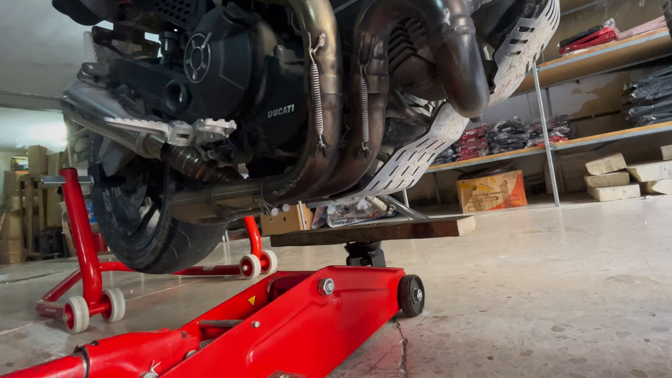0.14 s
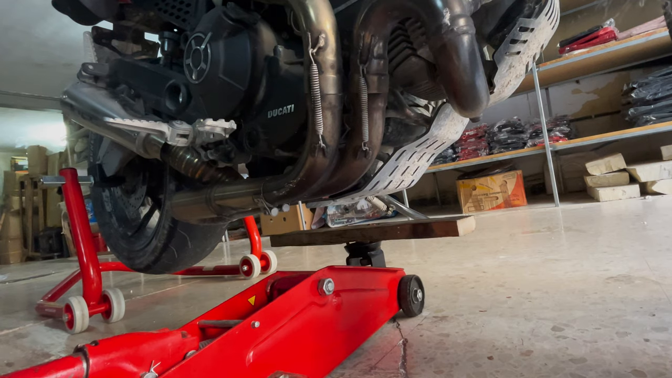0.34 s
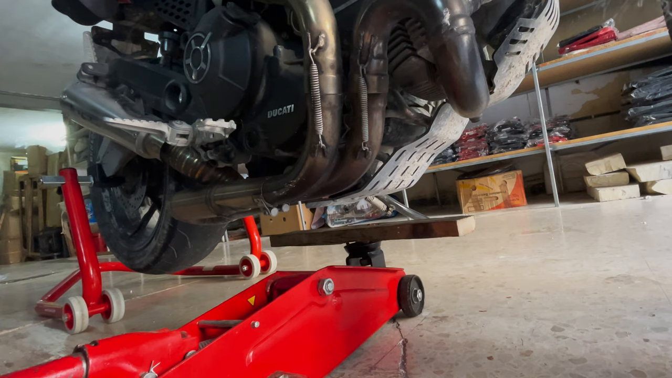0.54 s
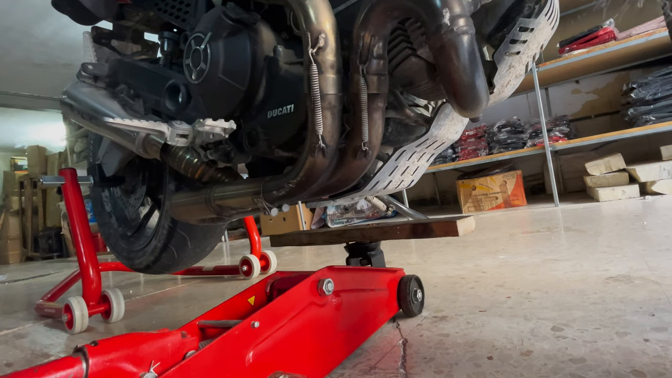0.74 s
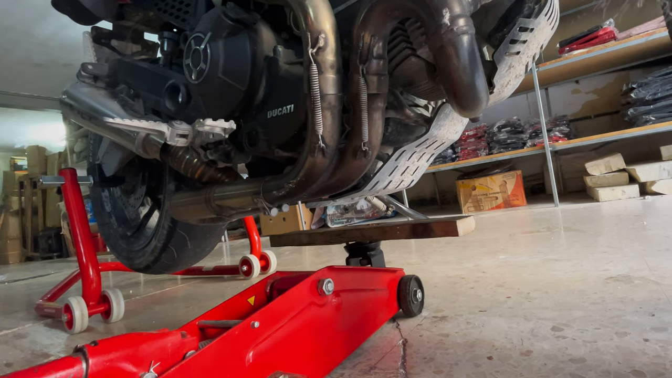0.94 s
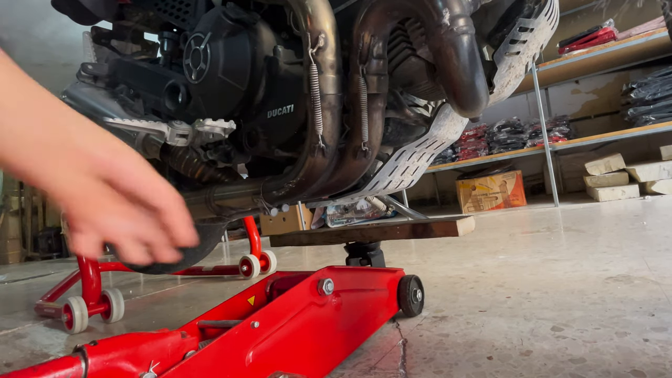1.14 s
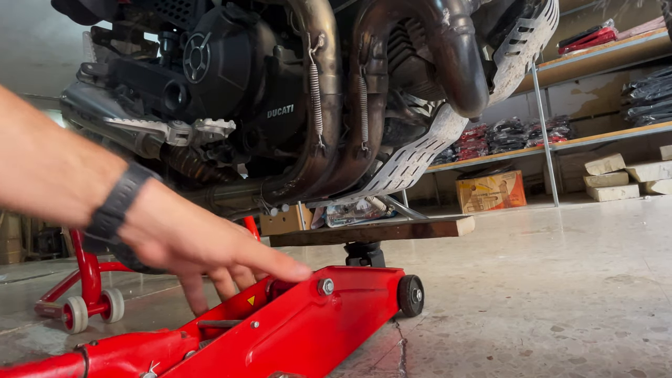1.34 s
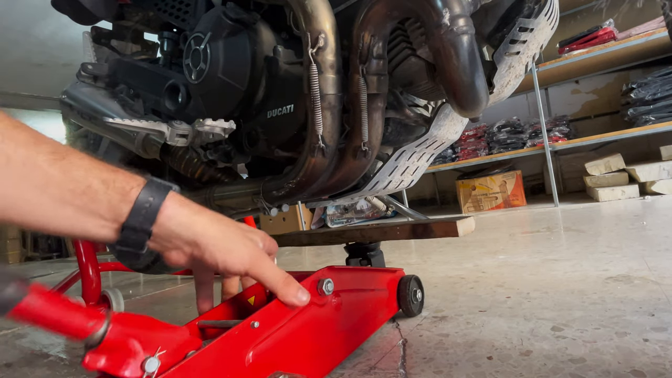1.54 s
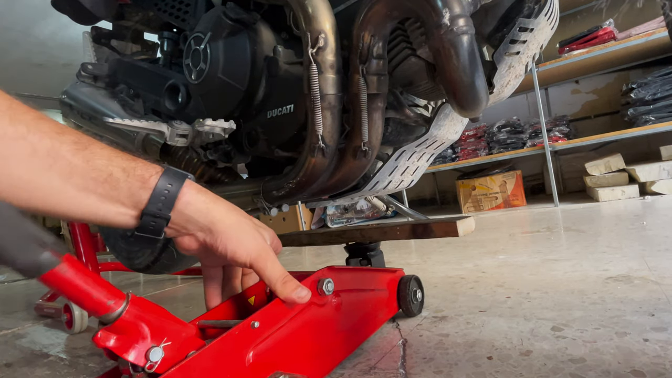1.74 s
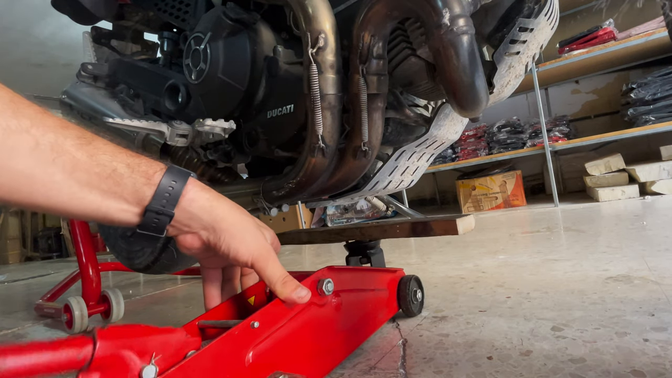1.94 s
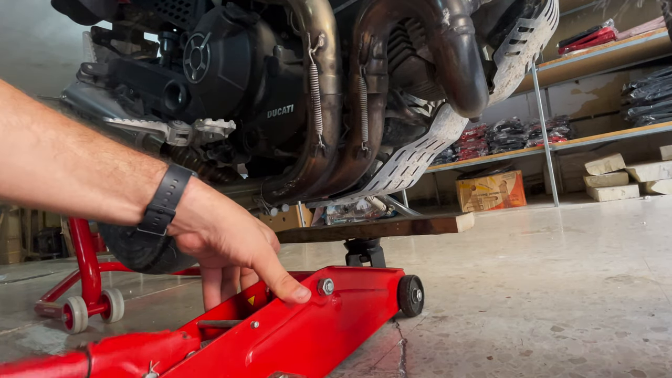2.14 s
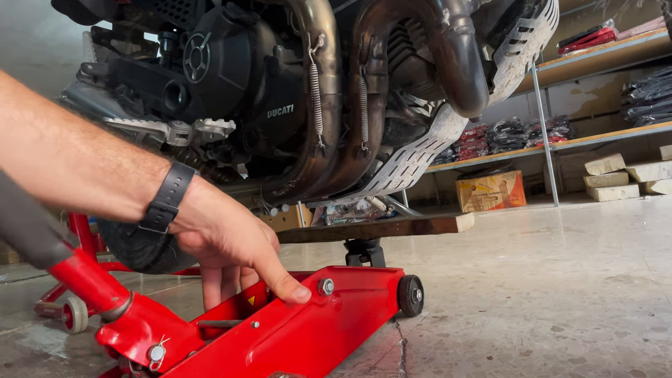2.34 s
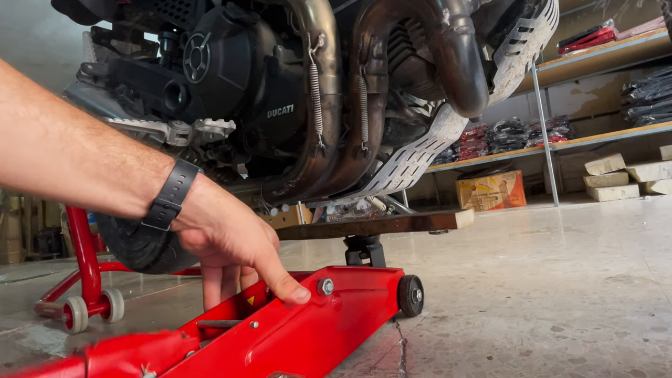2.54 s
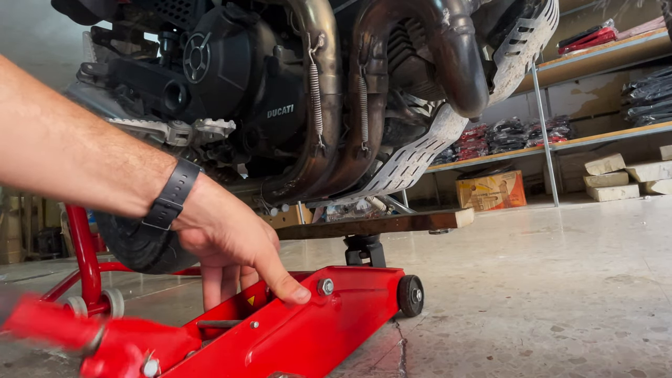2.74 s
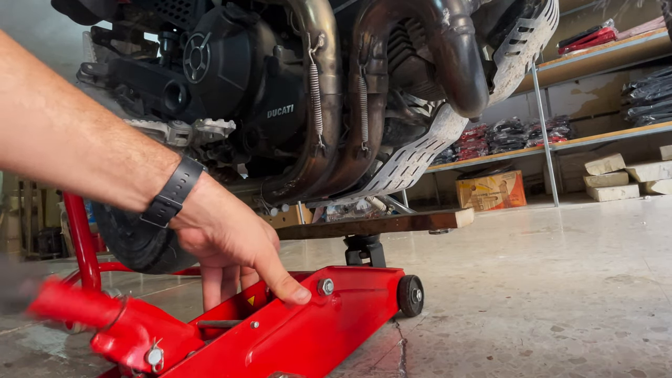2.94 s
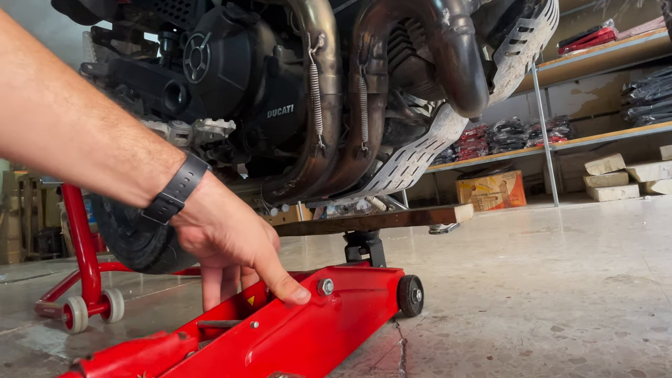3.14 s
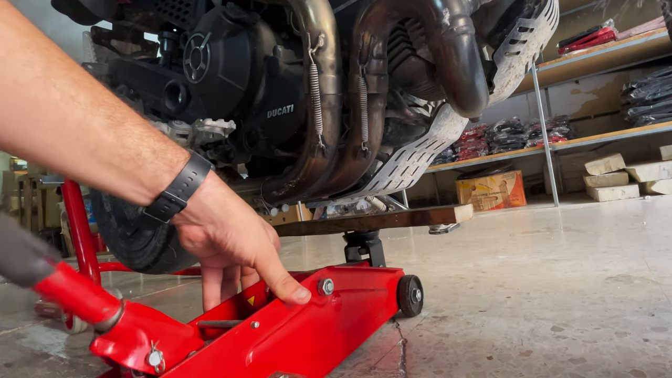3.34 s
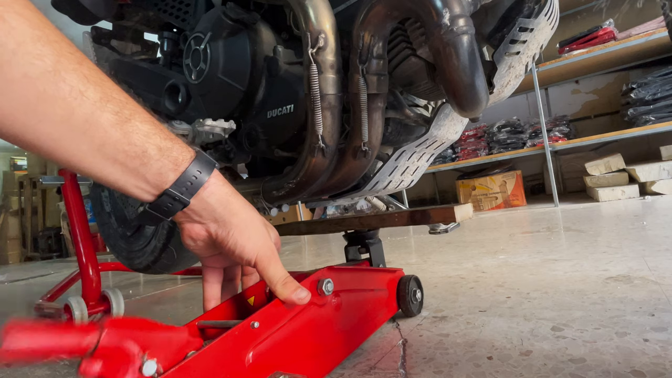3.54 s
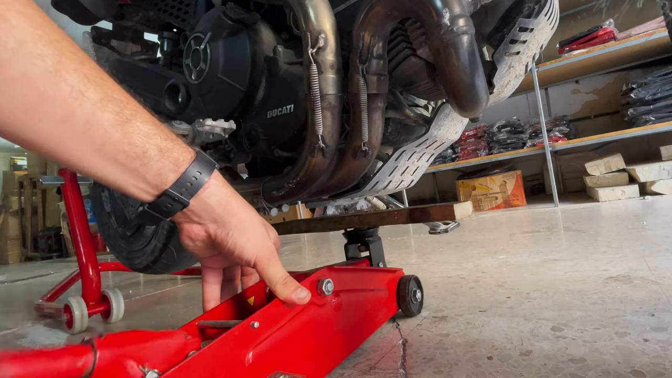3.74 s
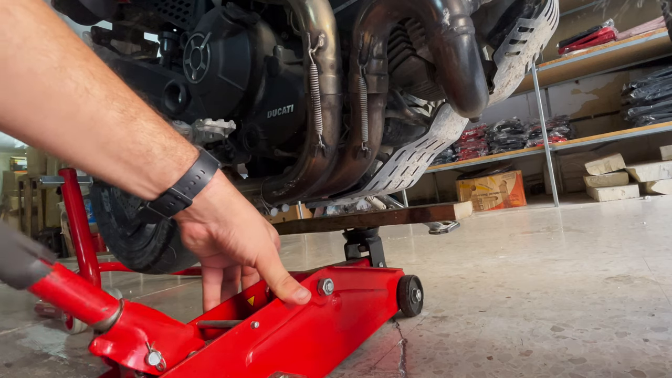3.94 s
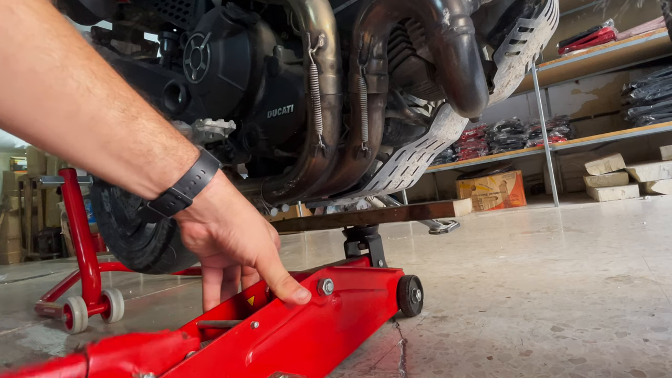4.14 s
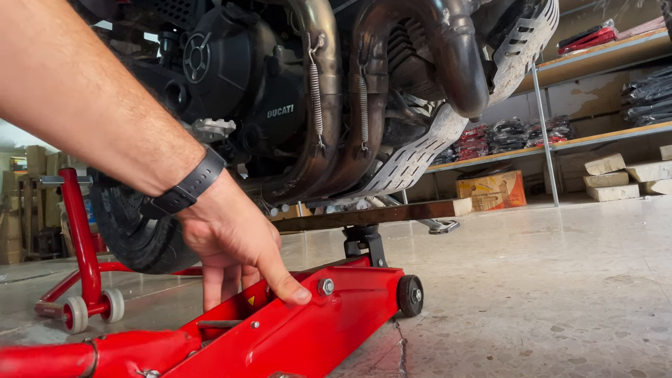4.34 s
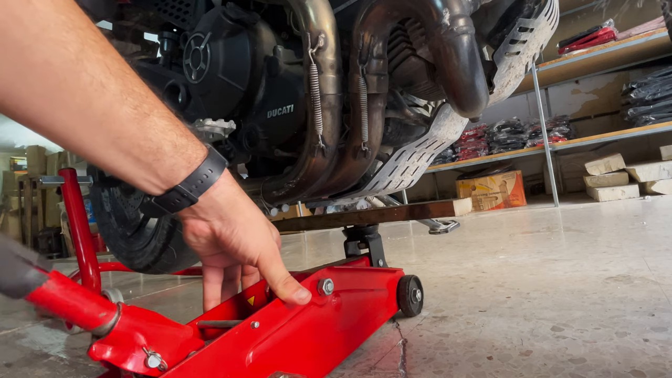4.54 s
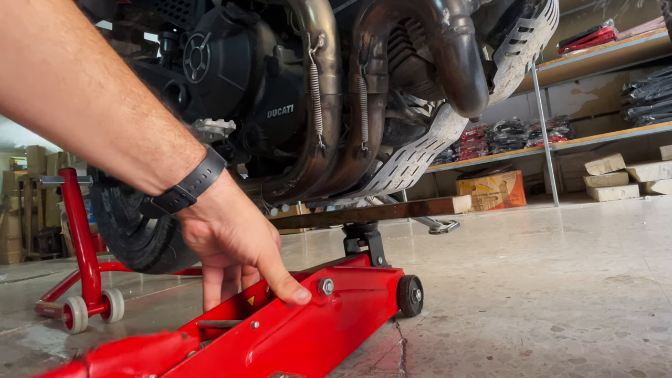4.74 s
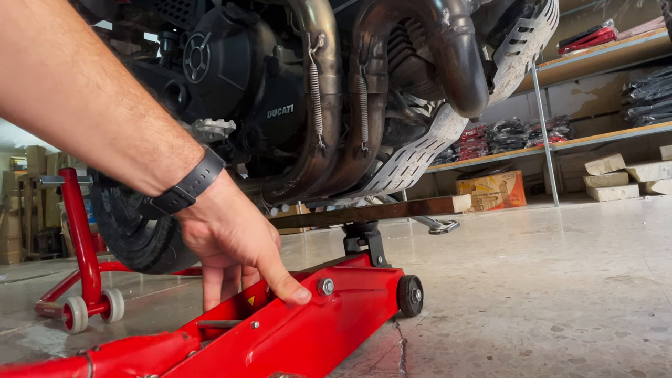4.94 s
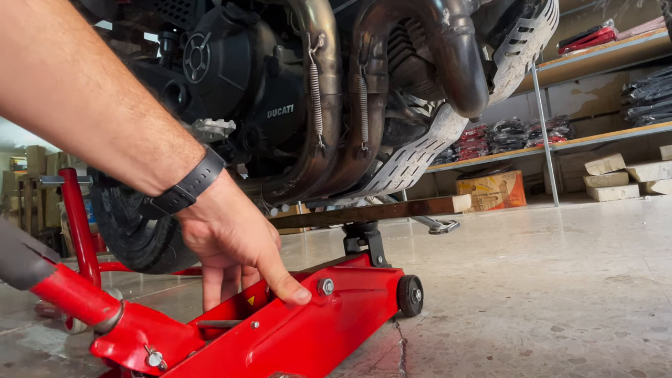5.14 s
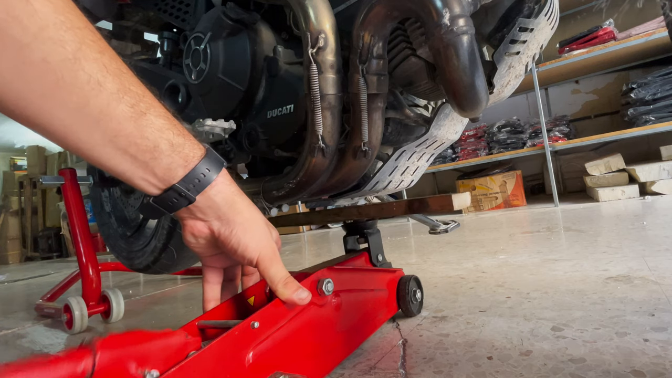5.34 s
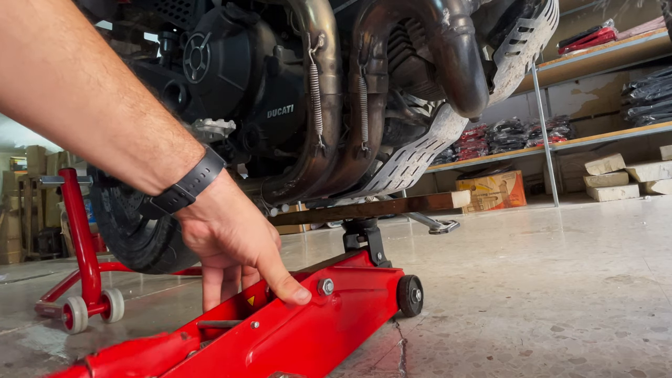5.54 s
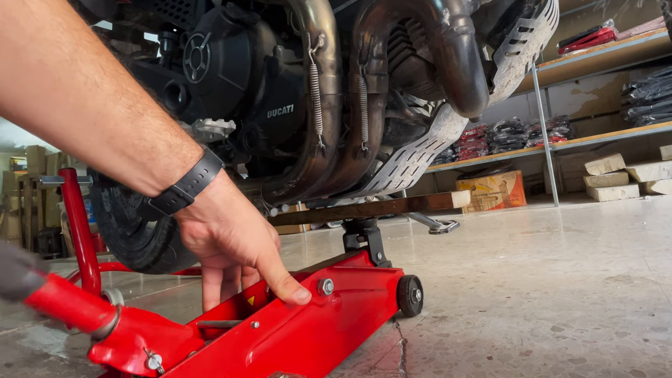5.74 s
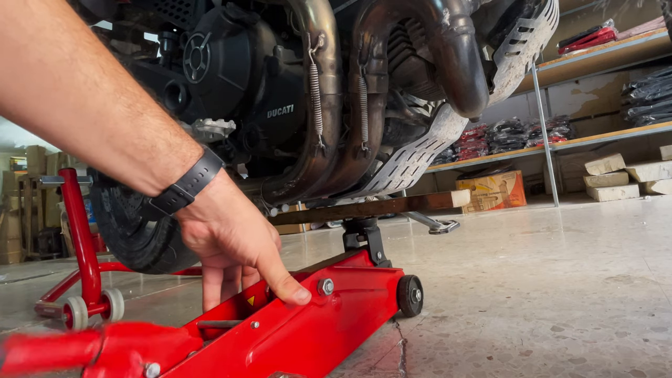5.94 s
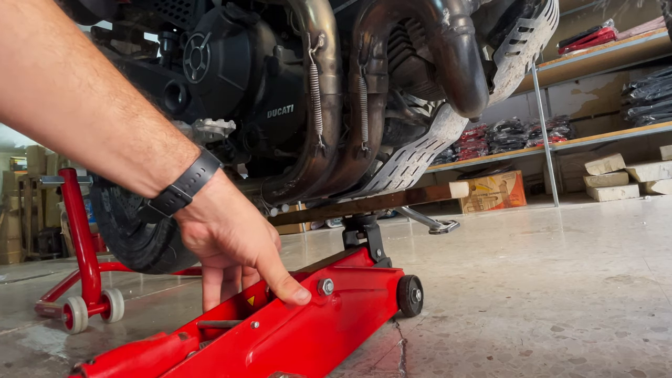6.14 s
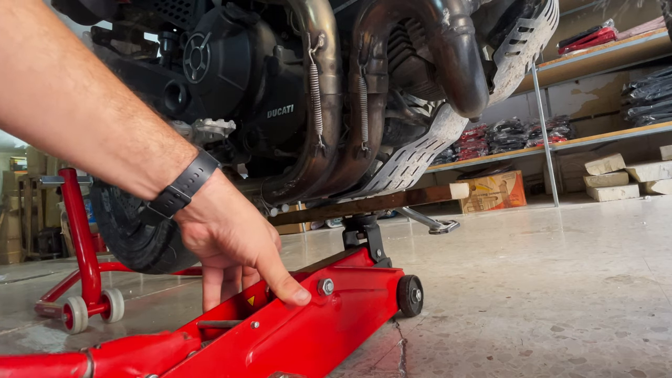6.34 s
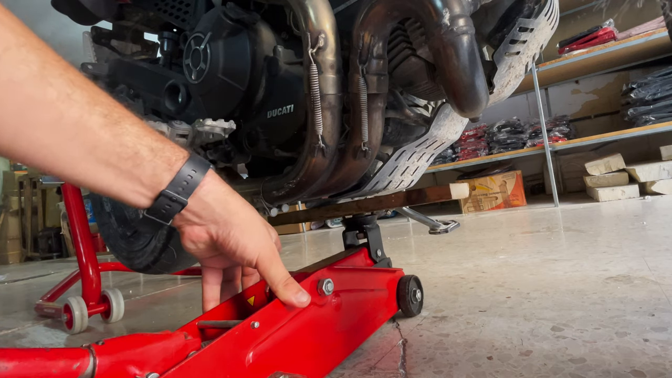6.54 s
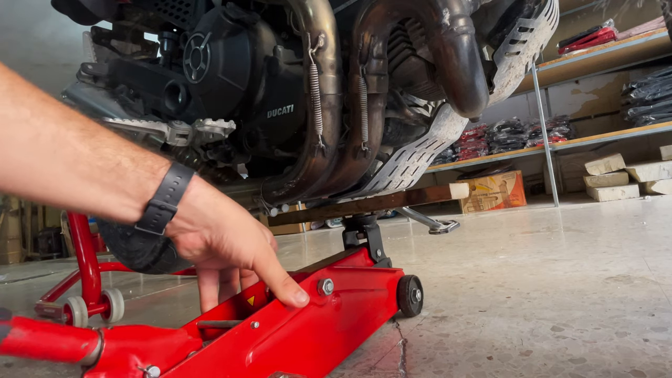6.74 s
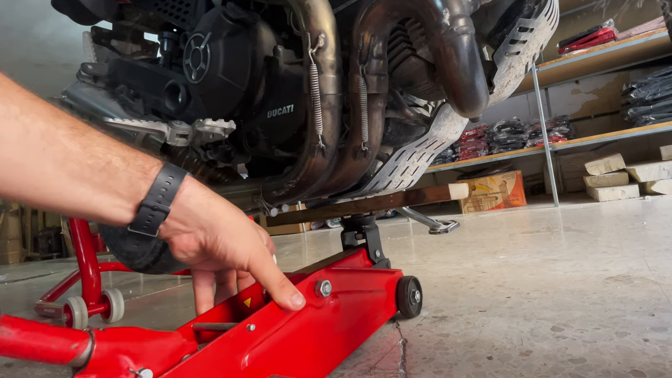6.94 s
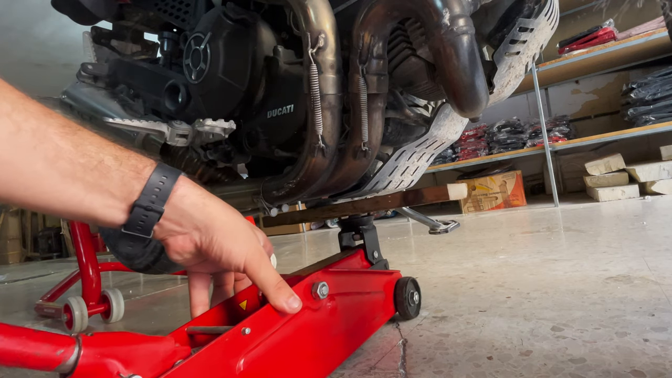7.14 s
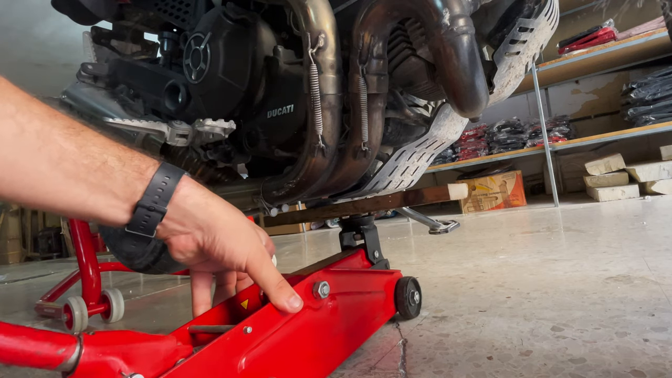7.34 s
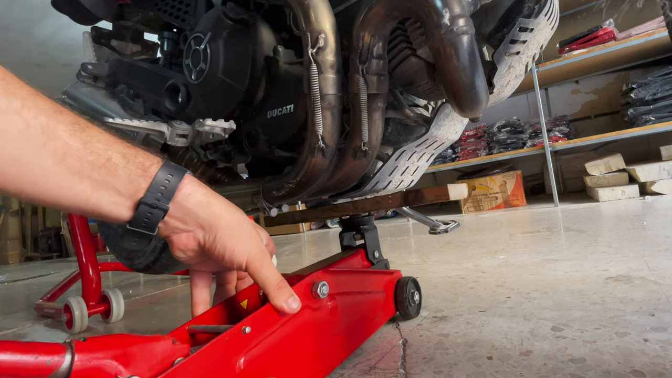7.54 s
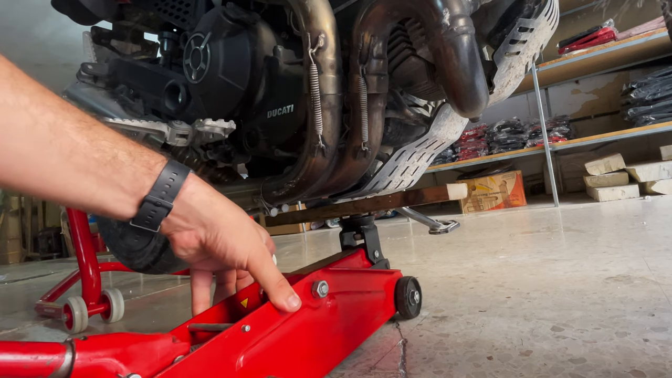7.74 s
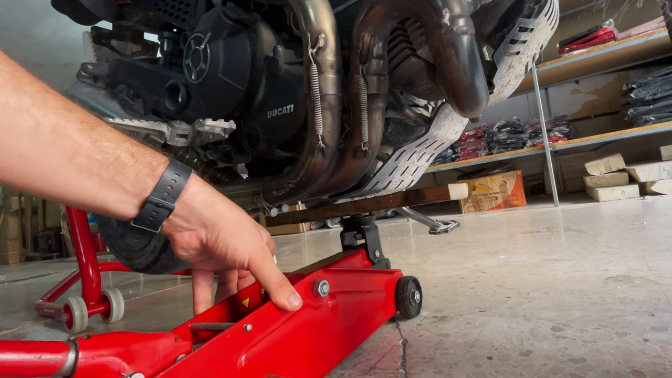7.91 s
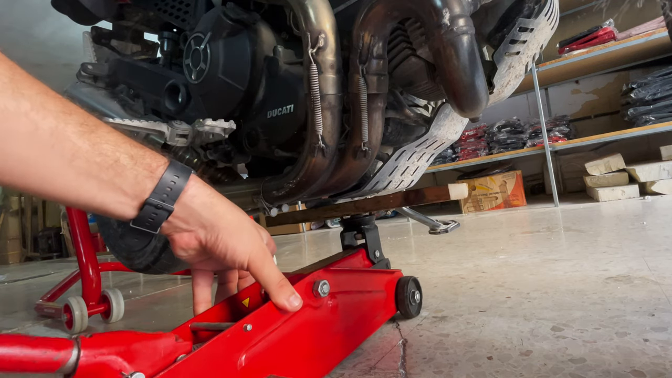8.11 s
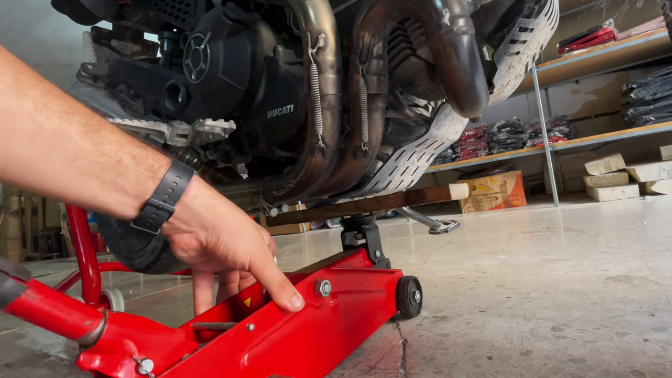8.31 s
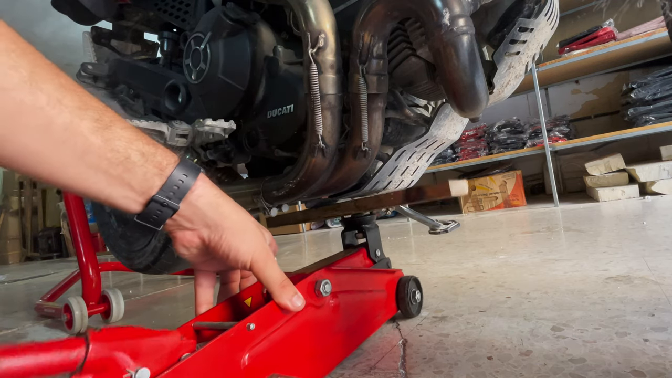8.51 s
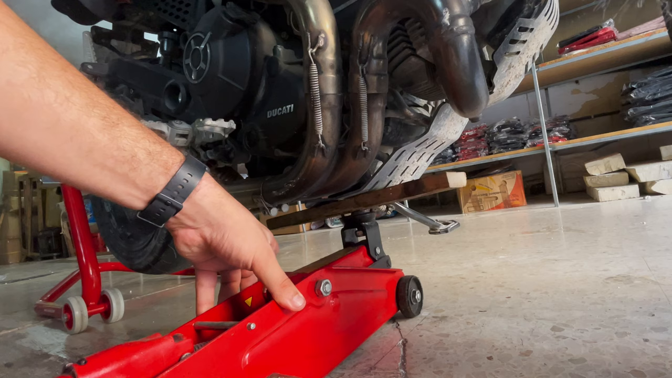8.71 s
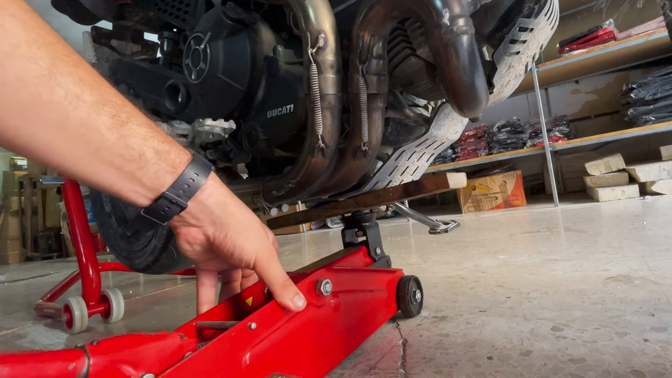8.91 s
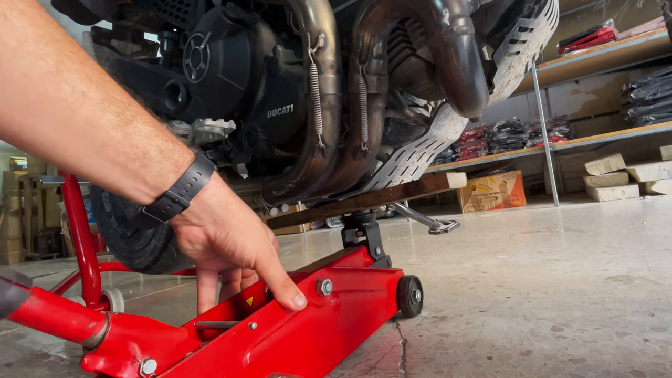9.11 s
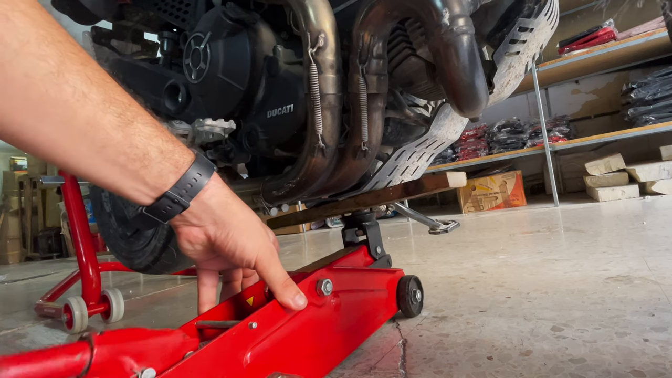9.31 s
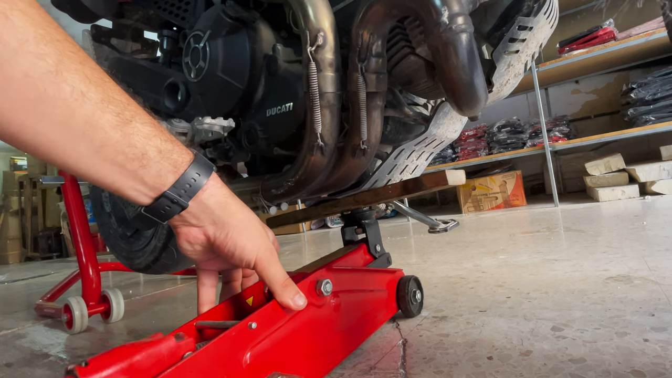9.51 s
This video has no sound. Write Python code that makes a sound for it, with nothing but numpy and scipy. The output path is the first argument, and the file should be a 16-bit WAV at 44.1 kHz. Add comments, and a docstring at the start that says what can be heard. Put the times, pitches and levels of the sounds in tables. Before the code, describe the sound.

A quiet garage with low room hush and a brief low puff of air on the close microphone at the very start. From 0.6 to 1.1 s, sleeve cloth rustles softly, with small dry ticks and light hollow taps. At about 1.4 s slack metal clicks, and fast jack pumping begins: hard, bright double clacks land near 1.9, 2.5, 3.0, 3.5, 4.1, 4.7 and 5.3 s. Between them pins click, loose links rattle, and soft low thuds bump the chassis. Sharp knocks continue at 5.5 to 6.4 s, then stop. Around 7 s a hand rubs faintly on steel with tiny clicks; near silence follows, with a soft bump at 7.5 s. Hollow knocks from 8.2 s lead to a strong clack at 8.5 s, smaller rattles at 8.8 to 8.95 s, and a final clack at 9.3 s. Each impact is dry and close, with a short, faint room tail.

```python
"""In a garage, a steel floor jack is pumped by hand close to a small microphone on the concrete.
After small ticks of hand or watch, slack handle, pins and plunger knock: noise bursts excite
resonances of steel, frame and chassis. Loose links tick during the pumping; a sleeve and a hand rub
as swells of grainy, filtered noise. Faint, thin, flickering tones are unsteady sines; decaying noise
forms the room's tail over a quiet hush."""
import sys
import numpy as np
from scipy import signal
from scipy.fft import rfft, irfft, next_fast_len
from scipy.io import wavfile
from scipy.ndimage import uniform_filter1d, map_coordinates

SR = 44100
rng = np.random.default_rng(int(sys.argv[2]) if len(sys.argv) > 2 else 0)


def store_pcm(level_fs):
    """Save levels as 16-bit WAV."""
    pcm = np.round(np.clip(level_fs, -1, 1) * 32767).astype(np.int16)
    wavfile.write(sys.argv[1], SR, np.atleast_2d(pcm).T)


N = 426447

# room tone, relative spectral density: (frequency [Hz], density [dB per Hz])
HUSH_SPECTRUM = [(20, -24.5), (38, -31.5), (57, -15), (95, -29), (150, -27), (300, -39.5), (1300, -43),
                 (2200, -51.5), (6000, -56.5), (15500, -65)]
# slow air pressure on the microphone: (time [s], level [dB])
AIR_SWAY = [(0, -25.5), (.35, -39), (.7, -47.5), (4, -43.5), (9.67, -49)]
# strokes of the sleeve, then of the hand: (peak time [s], rise [s], fall [s], level [dB])
SLEEVE_STROKES = [(.33, .01, 0.02, -65.5), (.6, 0.048, 0.061, -65.5), (.8, .04, 0.028, -60),
                  (.87, 0.019, 0.029, -55), (.94, 0.031, 0.02, -52), (1.02, 0.015, 0.029, -46),
                  (1.32, 0.063, 0.081, -62.5)]
HAND_STROKES = [(6.92, 0.091, 0.042, -60.5), (7.08, 0.079, 0.047, -57.5), (7.72, 0.025, 0.028, -68)]
# rubbed cloth, relative spectral density: (frequency [Hz], density [dB per Hz])
CLOTH_SPECTRUM = [(300, -26), (700, -3), (2000, 3), (6000, 2), (10000, 1), (15500, -9)]
# resonances of the rubbed steel: (frequency [Hz], width [Hz], relative level [dB])
RUBBED_STEEL = [(1050, 210, -6), (2487, 61, 3), (3175, 153, -7.5), (3960, 62, -27), (5350, 300, -13),
                (6880, 310, -7.5), (9860, 620, -18)]

# small ticks of hand or watch at first, then pins and links knocking as the handle swings:
# (time [s], ring level [dB], thud level [dB], pitch of part struck [Hz], chatter [ms])
KNOCKS = [(0.65, -52.5, -77, 6363.0, 4.9), (0.807, -43, -48.5, 2060, 14), (0.925, -48, -55.5, 3660.0, 3.2),
          (1.14, -47.5, -83, 10100, 3.8), (1.363, -37.5, -39, 2939.0, 7.7), (1.381, -38, -49, 3600, 9),
          (1.407, -36.5, -42.5, 9400, 11.3), (1.4752, -31, -26.5, 4898.0, 2),
          (1.481, -21, -32.5, 5070, 5.1), (1.512, -32.5, -42, 2410, 5.8), (1.775, -42, -43, 3020, 2.4),
          (1.8, -52, -41.5, 4400, 5.7), (2.144, -30.5, -39.5, 3994.0, 3.8), (2.152, -31.0, -46, 9500, 8.5),
          (2.188, -38, -46, 9323.0, 2), (2.206, -25.5, -32, 5200, 6.6), (2.219, -28.5, -26.5, 2637.0, 4.6),
          (2.275, -35, -29, 2030, 11.4), (2.419, -31, -41, 5530, 11), (2.482, -22, -25.5, 2370, 8.1),
          (2.667, -32, -39.5, 4060, 3.4), (2.686, -29, -35, 9400, 10), (2.725, -40, -27, 2770, 4.9),
          (2.733, -22, -29, 2870, 12.5), (2.905, -46, -56, 4250, 4.6), (2.922, -50, -43, 3100, 7.6),
          (2.9642, -27, -39, 5469.0, 5.1), (3.186, -24, -38.5, 4100, 8.9), (3.211, -36, -37, 2320, 6.8),
          (3.252, -40, -32.5, 8397.0, 2.3), (3.2615, -15.5, -26, 5040, 3.3), (3.322, -31.5, -26, 2300, 8),
          (3.432, -39.5, -46.5, 4310, 6.9), (3.52, -16, -39, 5660, 12.3), (3.553, -21, -37, 4270, 6.1),
          (3.737, -26.5, -28.5, 5500, 9.1), (3.755, -29.5, -58, 8387.0, 13), (3.8, -21, -35, 5700, 5.5),
          (3.841, -38.5, -46, 2045.0, 3.3), (4.022, -38, -43, 5500, 5), (4.282, -50.5, -56, 3550, 5.5),
          (4.297, -33, -32.1, 5460, 12), (4.309, -33, -31, 8300, 8.8), (4.34, -28.5, -34, 2885.0, 11.7),
          (4.393, -21.5, -28.5, 2720, 5.2), (4.672, -21, -28.5, 10120.0, 2.7),
          (4.894, -34.0, -46, 4250, 20), (4.904, -32, -34, 5458.0, 4.8), (4.943, -36.5, -35, 5530, 7.2),
          (4.993, -25, -32, 2170, 6.9), (5.035, -40, -36, 2476.0, 5.7), (5.191, -46, -42, 2034.0, 4.1),
          (5.284, -25, -25, 9900, 4.7), (5.293, -34.5, -31, 9797.0, 25), (5.463, -14.5, -22, 3210, 5.2),
          (5.543, -25.5, -32, 6830, 5.5), (5.594, -29.5, -40.1, 3326.0, 8), (5.6246, -22, -35.5, 4730, 4.9),
          (5.885, -47.5, -40, 3280, 5.4), (5.906, -37.5, -32, 5415.0, 6.1), (5.934, -23, -32, 9640, 9.4),
          (6.041, -58, -54, 9500, 5.6), (6.055, -50, -65, 4540, 3.6), (6.197, -36.0, -41.3, 3229.0, 7),
          (6.202, -18, -33, 3540, 6.6), (6.246, -28.5, -69, 9500, 4.4), (6.308, -45, -54.0, 2239.0, 8.7),
          (6.361, -31.5, -36.5, 2260, 7.1), (6.376, -35, -38, 8900.0, 2.1), (7.175, -46, -39.7, 2430, 8.3),
          (7.194, -47.5, -61, 6104.0, 2.5), (8.385, -43.5, -51, 3380, 7), (8.46, -43.5, -44.3, 5544.0, 5.4),
          (8.495, -21.5, -35.5, 8344.0, 11.4), (8.832, -40.5, -43.5, 2940, 10),
          (8.854, -30.4, -51, 9500, 2.3), (8.921, -42.2, -36, 2960, 13.0), (8.934, -43, -35, 2900, 2.8),
          (8.955, -26, -30.5, 3445.0, 2.7), (9.275, -28.5, -43, 6730, 4)]
# contacts with a stronger, hollow mid-range clank: columns as in KNOCKS
HOLLOW_CONTACTS = [(0.784, -41, -52, 2099.0, 4.6), (0.842, -44, -48, 6395.0, 7.6),
                   (0.858, -33, -45, 9937.0, 9.5), (3.335, -30, -32.5, 2280, 5.1),
                   (3.815, -25.5, -30.5, 3348.0, 5.1), (5.63, -27.5, -28, 2470, 4.5),
                   (5.945, -25, -28.2, 2820, 7.7), (8.197, -33, -39.5, 3326.0, 6.7),
                   (8.264, -38.5, -44.5, 3219.0, 3.5), (8.844, -31.5, -39, 6850, 5.6)]
HOLLOW_DB = 7  # added mid-range clank of these contacts
# clank of a knock: this share of ring dB, the rest thud dB, an offset, and a slope with pitch
RING_SHARE, CLANK_DB, CLANK_DB_PER_OCT = 0.39, -4, 0.5

# end of each down-stroke, slack taken up (the lead) and then the handle meets its stop:
# (stop time [s], ring level [dB], thud level [dB], chatter [ms], lead time [ms], lead ring level [dB])
DOWN_STROKES = [(1.8582, -11.5, -26, 2.6, 19.2, -20), (2.47, -14.5, -32, 6.5, 17, -17.5),
                (2.9927, -11.5, -23.5, 3.2, 19.7, -18.5), (3.5444, -12.5, -27, 3.3, 22.2, -18.5),
                (4.078, -15, -26, 6.5, 23, -16), (4.679, -14, -26, 4.14, 27.9, -24.5),
                (5.3063, -12.5, -27.5, 5.4, 28.9, -25), (8.5028, -14.5, -28.5, 3.2, 25, -19.5),
                (9.2876, -13.5, -31, 6.2, 22.4, -21.5)]
STOP_HZ, STOP_CLANK_DB = 9540, -12  # pitch of part struck; clank against ring
LEAD_HZ, LEAD_CHATTER_MS = 5750, 9
LEAD_CLANK_DB, LEAD_THUD_DB = -15.5, -14  # against ring

# soft bumps of the chassis with hardly any ring: (time [s], thud level [dB])
BUMPS = [(1.597, -40), (1.728, -39.5), (2.321, -34.5), (2.397, -43), (2.817, -29.5), (2.88, -36.5),
         (3.807, -25), (3.897, -34.5), (4.989, -29.5), (5.128, -39), (5.452, -27.5), (5.964, -31.5),
         (7.487, -47), (8.184, -37), (8.319, -50), (8.558, -41), (8.667, -47.5)]
BUMP_HZ, BUMP_CHATTER_MS = 1180, 13
BUMP_RING_DB, BUMP_CLANK_DB = -19.5, -6.5  # against thud

# resonances of pins, handle and arms; of the side plates; of the chassis on concrete:
# (frequency [Hz], width [Hz], nominal relative level [dB])
STEEL = [(2565, 53, -14), (3290, 130, -23), (4008, 100, -4), (4713, 50, -20), (5540, 120, -4),
         (6690, 37, -3.5), (8455, 54, -6.5), (9330, 80, -0.5), (10430, 400, -2.5), (10150, 93, -4),
         (11800, 87, -2), (14000, 60, -3.5), (14700, 120, -6)]
FRAME = [(1087, 95, 5), (1375, 71, -9), (1737, 140, 1), (2044, 47, -17), (555.6, 350, -2.5)]
BASE = [(83.3, 18, -8), (118, 21, -4), (141, 23, -3.5), (185, 34, -1), (278.2, 110, -4), (339.3, 130, -4)]

# reverberation time of the room: (frequency [Hz], time to fall 60 dB [s])
ROOM_DECAY = [(100, 0.43), (700, 0.47), (5000, 0.31), (13000, 0.27)]
# faint, thin, flickering tones: (start [s], end [s], mean frequency [Hz], nominal level [dB])
FAINT_TONES = [(1.13, 1.3, 4020, -66.5), (7.201, 8.1, 2860, -79.5), (8.591, 9.242, 4060, -77),
               (9.4, 11, 2800, -73), (9.345, 12, 3300, -76)]
# fast pumping: (start [s], end [s])
PUMPING = [(1.36, 6.4)]
# treble fall of the microphone: (frequency [Hz], gain [dB])
MIC_TREBLE = [(9000, -2), (11500, -1), (15500, -4.5)]
TOP_HZ = 15700  # centre of the microphone's upper band edge


def amp(db):
    """Amplitude ratio: twenty decibels for each factor of ten."""
    return 10 ** (np.asarray(db) / 20)


def unit(x):
    """Normalization: the signal is scaled to an rms of 1."""
    return x / np.sqrt(np.mean(x ** 2) + 1e-20)


def peaked(x, size):
    """Peak power: the loudest running mean over size samples is made that of a unit sine."""
    return x / np.sqrt(2 * np.abs(uniform_filter1d(x ** 2, size)).max() + 1e-20)


def along(points, at):
    """Logarithmic interpolation: (frequency, value) points are read on a log-frequency axis."""
    hz, value = np.transpose(points)
    return np.interp(np.log(at + 1), np.log(hz + 1), value)


def curve(rows):
    """Envelope: levels in dB become a gain per sample, practically silent outside their span."""
    time, db = np.transpose(rows)
    return amp(np.interp(np.arange(N) / SR, time, db, left=-140, right=-140))


def stroke(rows):
    """Asymmetric Gaussian envelopes: each swell has its own rise and fall."""
    t = np.arange(N) / SR
    return sum(amp(db) * np.exp(-((t - peak) / np.where(t < peak, rise, fall)) ** 2 / 2)
               for peak, rise, fall, db in rows)


def wobble(rate):
    """Band-limited fluctuation: a smooth curve through random knots, rate of them a second."""
    knots = rng.standard_normal(int(N * rate / SR) + 4)
    return map_coordinates(knots, [np.arange(N) * rate / SR])


def filtered(x, response):
    """Linear filtering: the spectrum is multiplied by a response of frequency."""
    m = next_fast_len(x.shape[-1] + 3000)
    spectrum = rfft(x, m) * response(np.fft.rfftfreq(m, 1 / SR))
    return irfft(spectrum, m)[..., :x.shape[-1]]


def modes(table, extra_db=None):
    """Modal superposition: damped resonators of alternating sign add to a causal response."""
    extra_db = np.zeros(len(table)) if extra_db is None else extra_db

    def response(f):
        return sum((-1) ** k * amp(db + extra_db[k]) * 1j * f * width / (hz * hz - f * f + 1j * f * width)
                   for k, (hz, width, db) in enumerate(table))
    return response


def hush():
    """Broadband noise: room tone wavers in level while slow air moves the diaphragm."""
    tone = filtered(rng.standard_normal(N), lambda f: amp(along(HUSH_SPECTRUM, f)) * (f > 20))
    sway = filtered(rng.standard_normal(N), lambda f: f / (1 + (f / 3) ** 2.7) * (f < 30))
    return amp(-59.0 + .8 * wobble(9)) * unit(tone) + curve(AIR_SWAY) * unit(sway)


def rubbing():
    """Friction noise: grainy noise takes the color of brushed cloth, later of steel under a hand."""
    grainy = rng.standard_normal((2, N)) * amp(1.5 * wobble(300) + 1.2 * wobble(30))
    sleeve = filtered(grainy[0], lambda f: amp(along(CLOTH_SPECTRUM, f)))
    # steel resonances over a broad hiss
    hand = filtered(grainy[1], lambda f: modes(RUBBED_STEEL)(f) + 0.19 * (f > 700) / (1 + (f / 9000) ** 2))
    return stroke(SLEEVE_STROKES) * unit(sleeve) + stroke(HAND_STROKES) * unit(hand)


def knock_clank(ring_db, thud_db, hz):
    """Shared excitation: the clank's level follows a mix of ring and thud, and the pitch struck."""
    mix = RING_SHARE * ring_db + (1 - RING_SHARE) * thud_db
    return mix + CLANK_DB + CLANK_DB_PER_OCT * np.log2(hz / LEAD_HZ)


def contacts():
    """Impact sequence: (time [s], ring [dB], clank [dB], thud [dB], part struck [Hz], chatter [ms])."""
    stops = [(s, ring, ring + STOP_CLANK_DB, thud, STOP_HZ, ms)
             for s, ring, thud, ms, _, _ in DOWN_STROKES]
    leads = [(s - lead_ms / 1000, ring, ring + LEAD_CLANK_DB, ring + LEAD_THUD_DB, LEAD_HZ, LEAD_CHATTER_MS)
             for s, _, _, _, lead_ms, ring in DOWN_STROKES]
    knocks = [(s, ring, knock_clank(ring, thud, hz), thud, hz, ms)
              for s, ring, thud, hz, ms in KNOCKS]
    hollow = [(s, ring, knock_clank(ring, thud, hz) + HOLLOW_DB, thud, hz, ms)
              for s, ring, thud, hz, ms in HOLLOW_CONTACTS]
    bumps = [(s, thud + BUMP_RING_DB, thud + BUMP_CLANK_DB, thud, BUMP_HZ, BUMP_CHATTER_MS)
             for s, thud in BUMPS]
    return stops + leads + knocks + bumps + hollow


def impact(ring_db, clank_db, thud_db, hz, ms):
    """Impact excitation: a chatter of micro-impacts drives steel and frame, a soft push the chassis."""
    t = np.arange(5000) / SR
    noise, spikes, scatter = rng.standard_normal((3, len(t)))
    life = np.abs(ms) / 1000
    attack = 1 - np.exp(-t / (0.16 * life))
    decay = np.exp(-(t / life) ** 2 * 0.47) + 0.16 * np.exp(-t / 0.011)
    lumps = amp(30 * uniform_filter1d(spikes, size=40))  # about 1 ms long
    chatter = noise * lumps * attack * decay

    # parts pitched like the struck one answer most
    tilt = -8.5 * np.abs(np.log2(np.array(STEEL)[:, 0] / hz))
    steel = modes(STEEL, tilt + 2.5 * scatter[:len(STEEL)])
    struck = modes([(hz, hz / 14, 1.2), (hz * 0.88, hz * 1.4, -9)])  # its own ring and the broad click
    frame = modes(FRAME + [(1300, 1500, -12)], 2.5 * scatter[20:])
    base = modes(BASE, 3 * scatter[30:])

    # low-pitched contacts carry little treble
    ring = filtered(chatter, lambda f: (steel(f) * amp(4.5) + struck(f)) / (1 + 1j * f / (0.7 * hz)))
    clank = filtered(chatter, lambda f: frame(f) / (1 + 1j * f / (1.1 * hz)))
    push = t * np.exp(-t / 0.00056)  # the blow itself, softened by the mass of the jack
    thud = filtered(push + .0001 * chatter, lambda f: base(f) / (1 + 1j * f / 900))

    sound = amp(ring_db) * peaked(ring, size=110)
    sound += amp(clank_db) * peaked(clank, size=176)
    sound += amp(thud_db) * peaked(thud, size=352)
    return sound * np.minimum(1, (t[-1] - t) / .03)  # fade out over 30 ms


def impacts():
    """Superposition: the ring, clank and thud of every contact add at their times."""
    out = np.zeros(N + SR)
    for s, *settings in contacts():
        sound = impact(*settings)
        out[round(s * SR) - 30:][:len(sound)] += sound
    return out[:N]


def garage(x, piece=SR // 4):
    """Reverberation: each piece meets a fresh noise tail whose decay rate depends on frequency."""
    out = np.zeros(N + 2 * SR)
    for i in range(0, N, piece):
        hz, t, z = signal.stft(rng.standard_normal(SR // 2), SR, nperseg=256)
        decay = amp(-60 * t / along(ROOM_DECAY, hz)[:, None])
        tail = signal.istft(z * decay, SR, nperseg=256)[1]
        wet = signal.fftconvolve(x[i:i + piece], tail / np.linalg.norm(tail))
        out[i + 250:][:len(wet)] += wet  # the tail starts some 6 ms late
    return out[:N]


def faint_tones():
    """Modulated sinusoids: faint, thin tones flicker in level and waver in frequency."""
    t = np.arange(N) / SR
    out = np.zeros(N)
    for start, end, hz, db in FAINT_TONES:
        swell = np.clip(np.minimum(t - start, end - t) / 0.06, 0, 1)
        level = amp(db + 4 * wobble(50))
        phase = 2 * np.pi * np.cumsum(hz + 25 * wobble(80)) / SR
        out += level * swell * np.sin(phase)
    return out


def rattle(count=120):
    """Random impulse excitation: loose links tick on frame and chassis during the fast pumping."""
    when, size = rng.random((count, 2)).T
    ticks = np.zeros(N)
    ticks[(when * (N - 1)).astype(int)] = amp(14 * size)
    t = np.arange(N) / SR
    ticks *= sum((t > start) & (t < end) for start, end in PUMPING)  # ticks outside are dropped

    def response(f):
        frame = amp(-25.5) * modes(FRAME)(f) / (1 + 1j * f / 900) ** 2
        base = amp(-11.0) * modes(BASE)(f) / (1 + 1j * f / 400)
        return frame + base
    return filtered(ticks, response)


def scene():
    """Direct and reflected sound: impacts, rattle and their room tail add to rubbing, tones and hush."""
    near = impacts() + rattle()
    return (near + amp(-13.5) * garage(near) + rubbing() + faint_tones() + hush())[None]


def record(dry):
    """Transducer response: the microphone loses some treble and keeps nothing above its band limit."""
    def response(f):
        band = np.clip((TOP_HZ + 100 - f) / 200, 0, 1)  # edge 200 Hz wide
        return amp(along(MIC_TREBLE, f)) * band
    return filtered(dry, response)


dry = scene()
out = record(dry)
store_pcm(out)
```